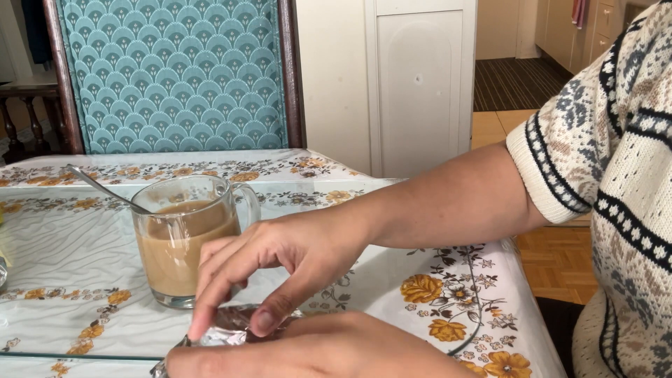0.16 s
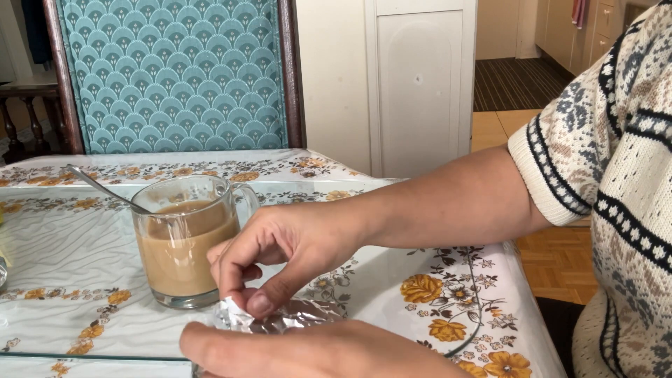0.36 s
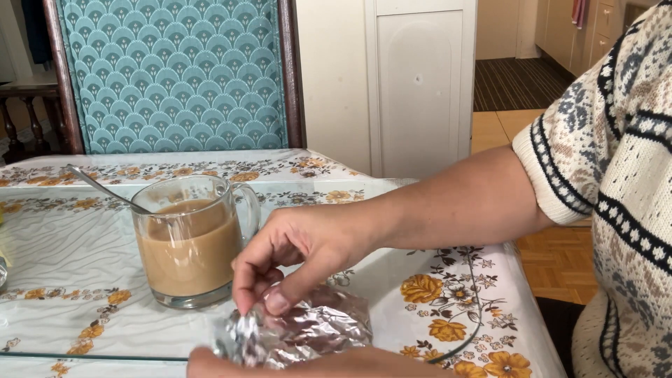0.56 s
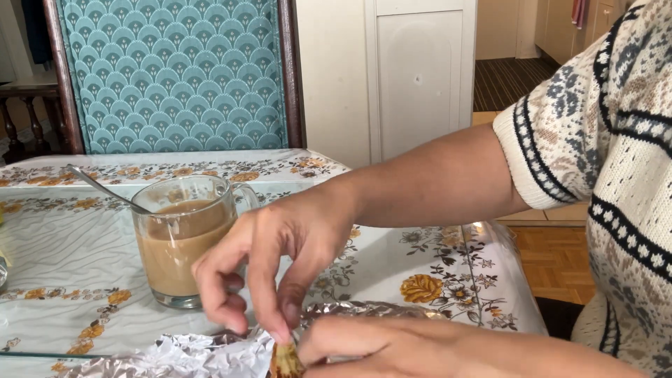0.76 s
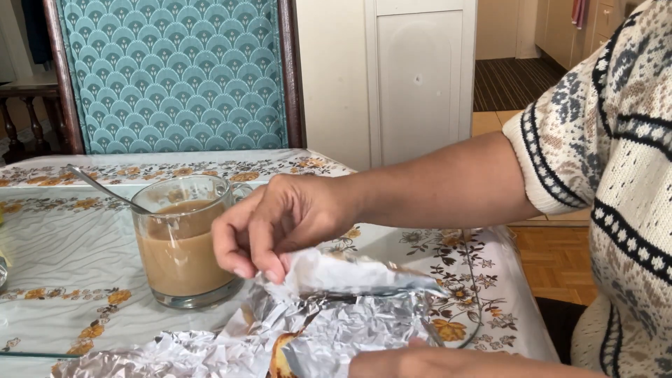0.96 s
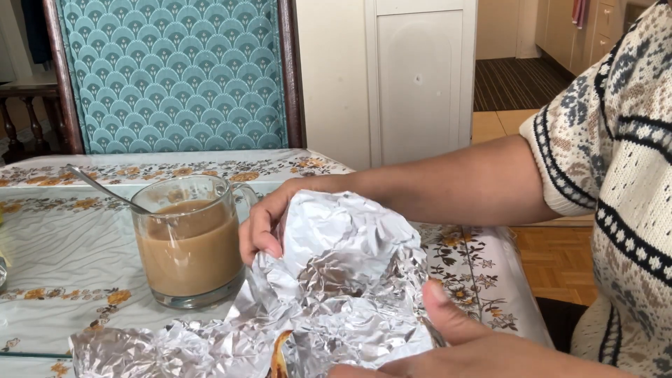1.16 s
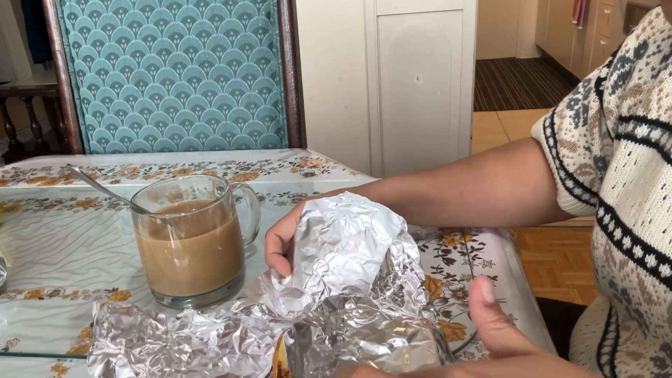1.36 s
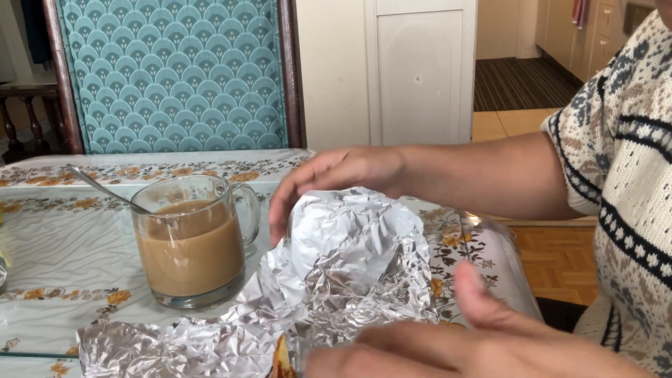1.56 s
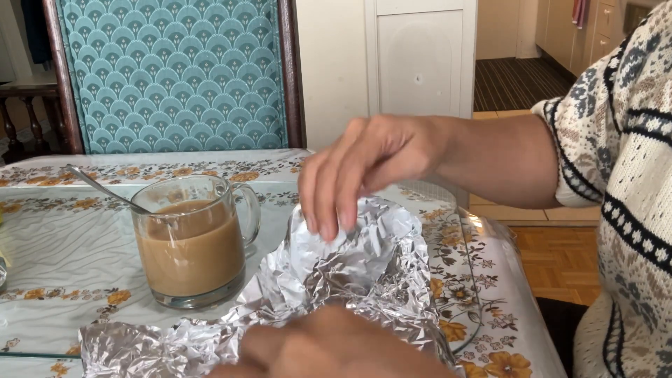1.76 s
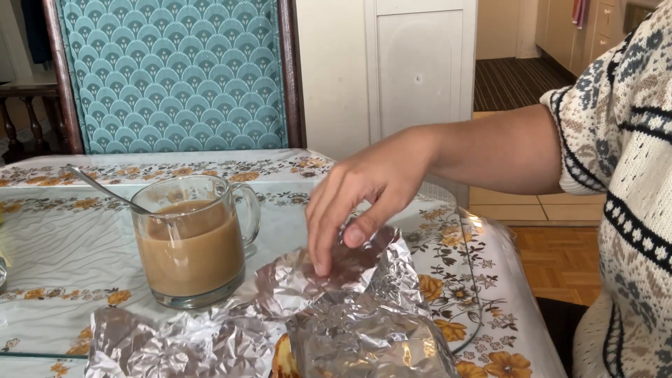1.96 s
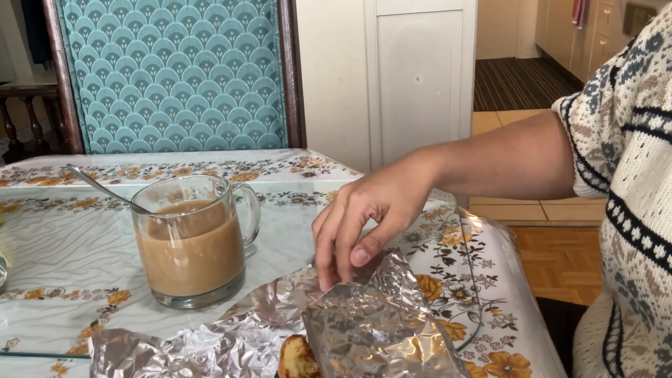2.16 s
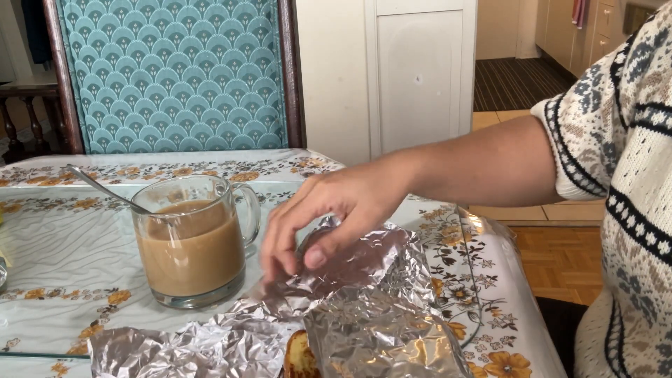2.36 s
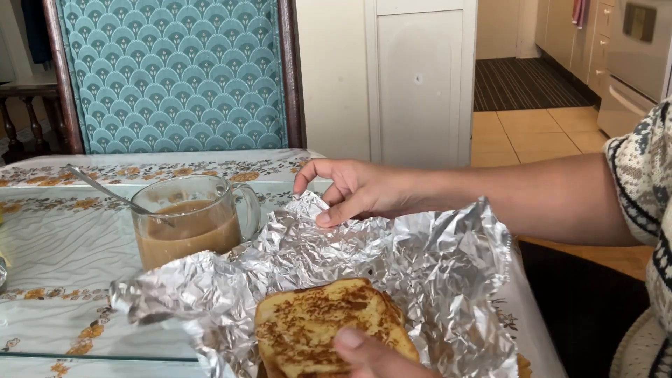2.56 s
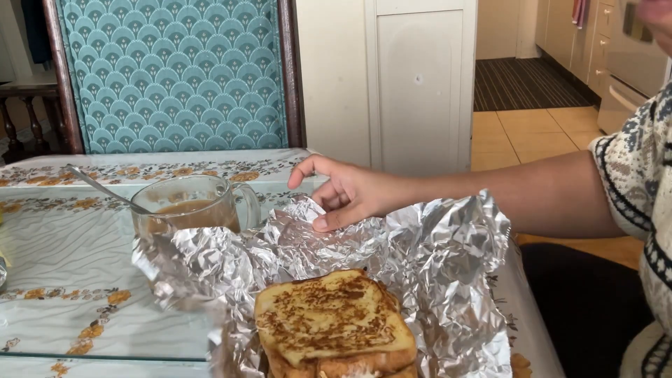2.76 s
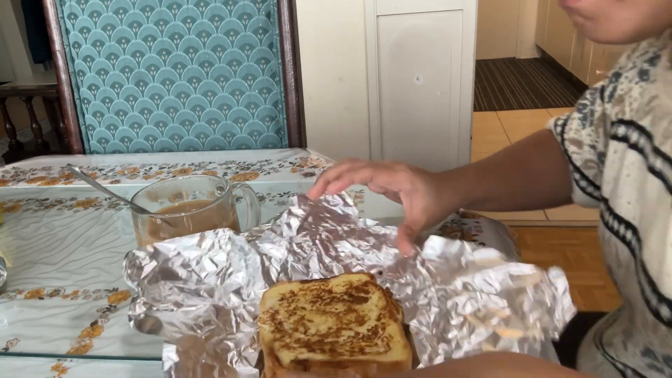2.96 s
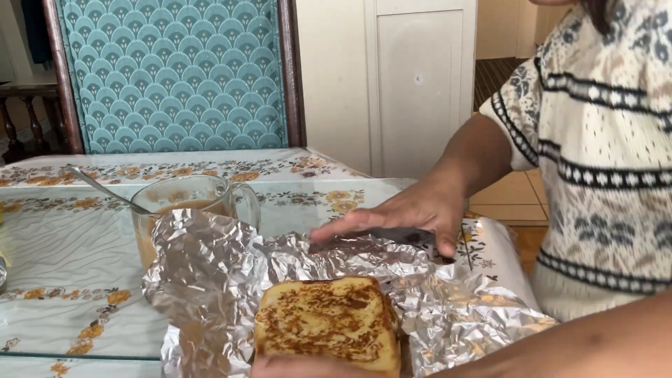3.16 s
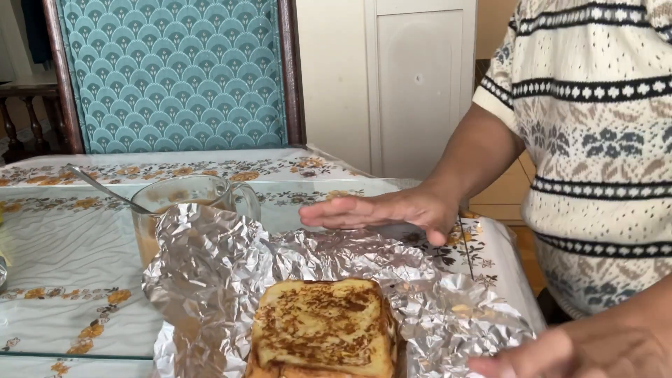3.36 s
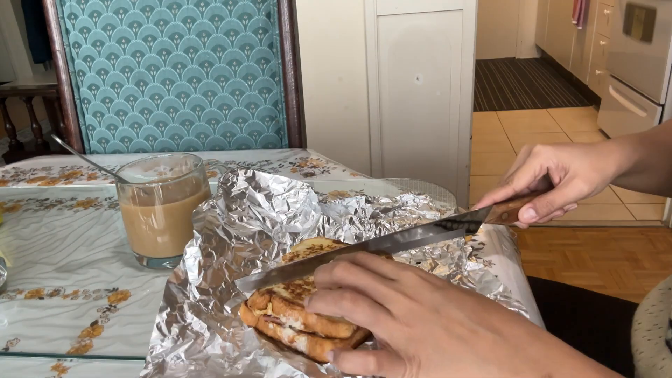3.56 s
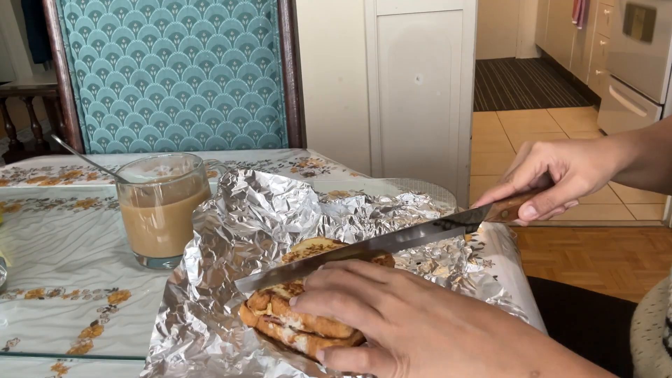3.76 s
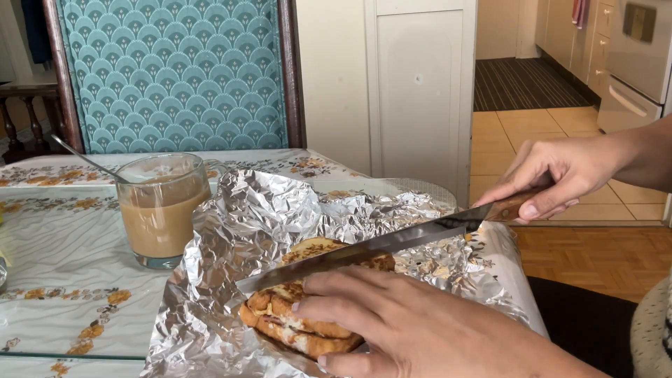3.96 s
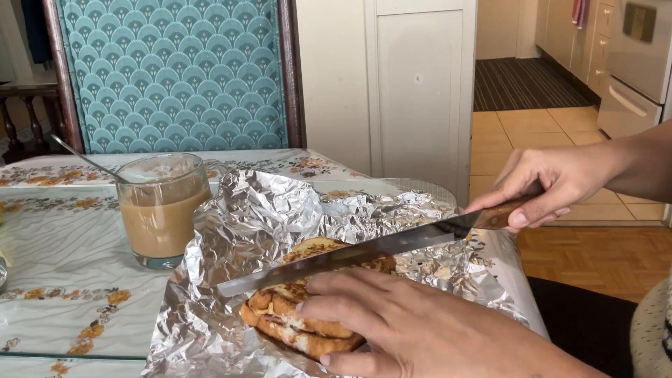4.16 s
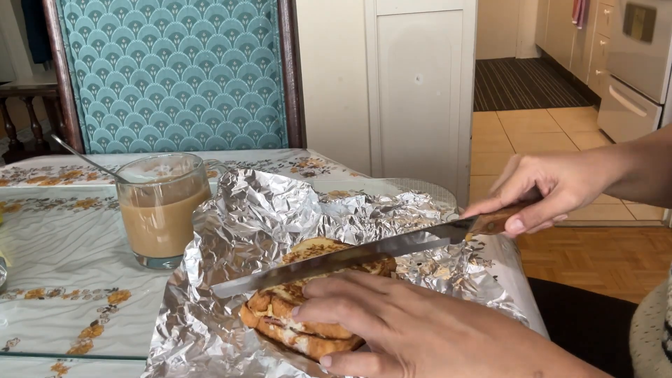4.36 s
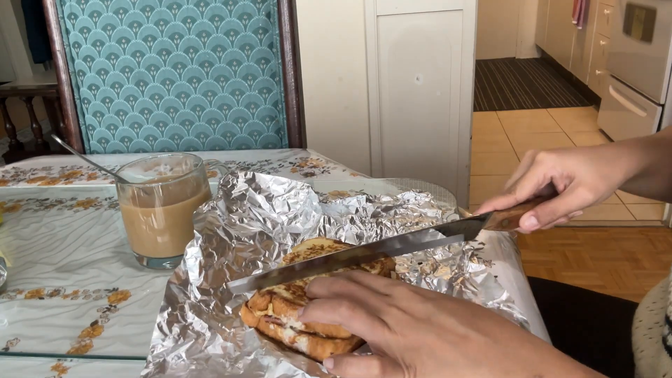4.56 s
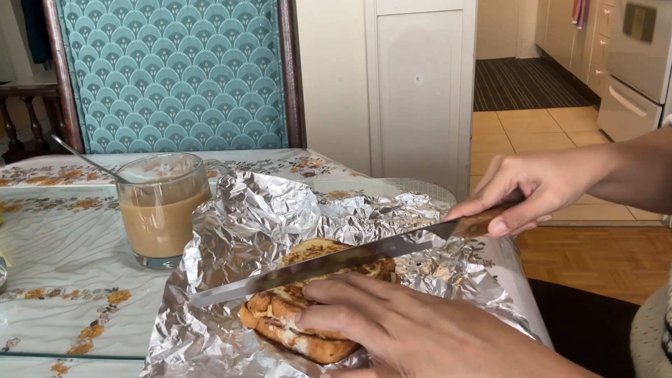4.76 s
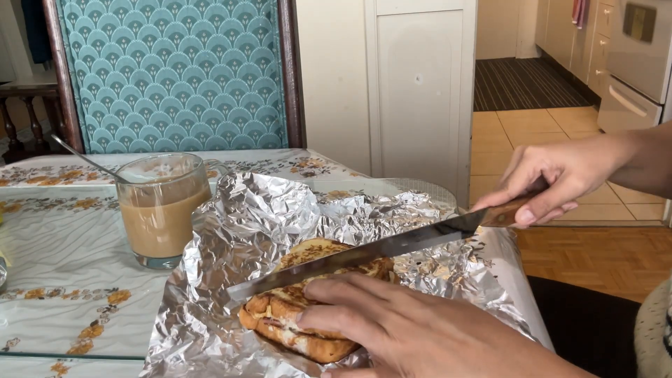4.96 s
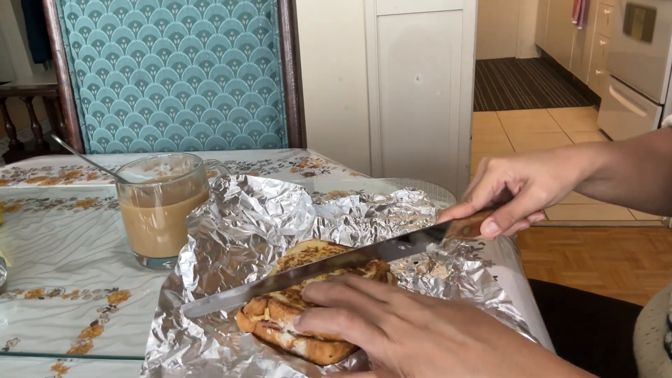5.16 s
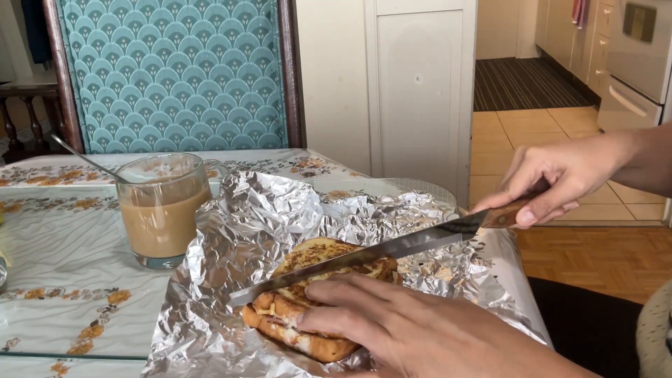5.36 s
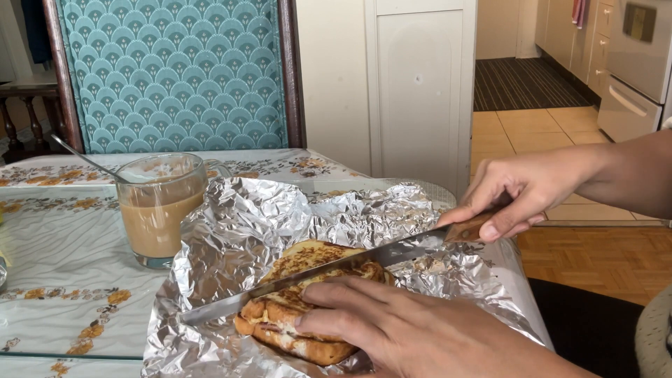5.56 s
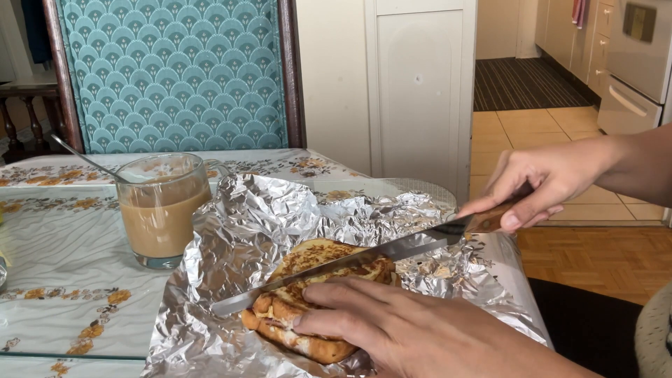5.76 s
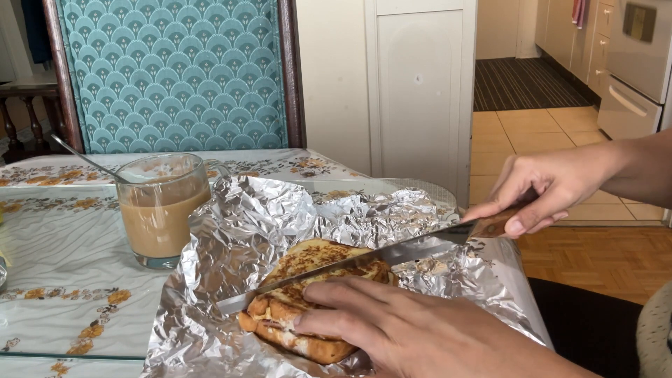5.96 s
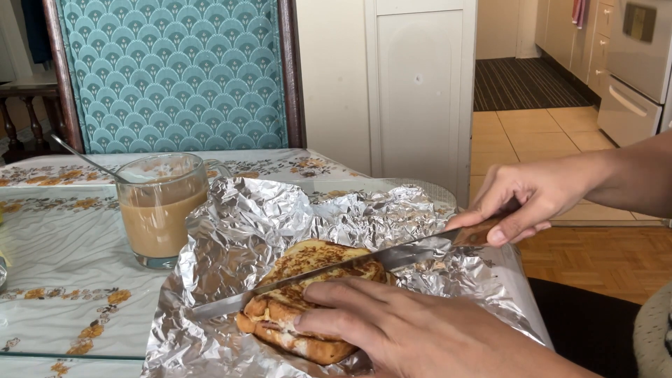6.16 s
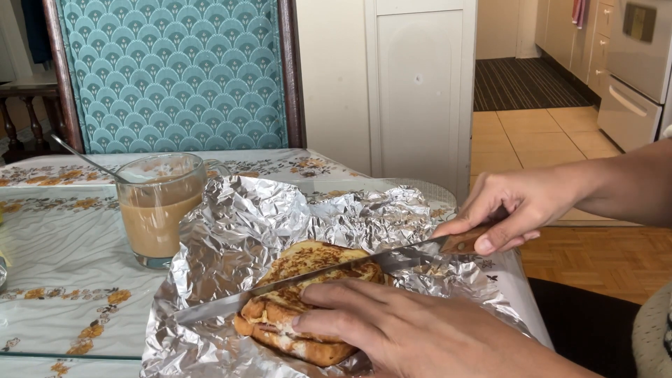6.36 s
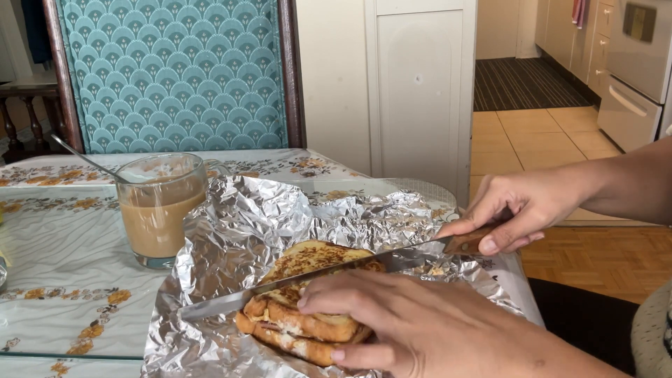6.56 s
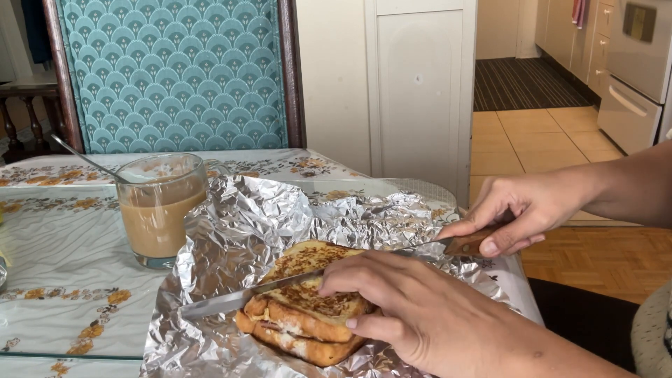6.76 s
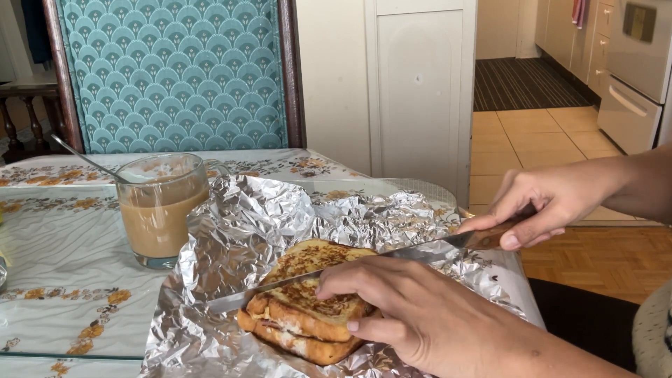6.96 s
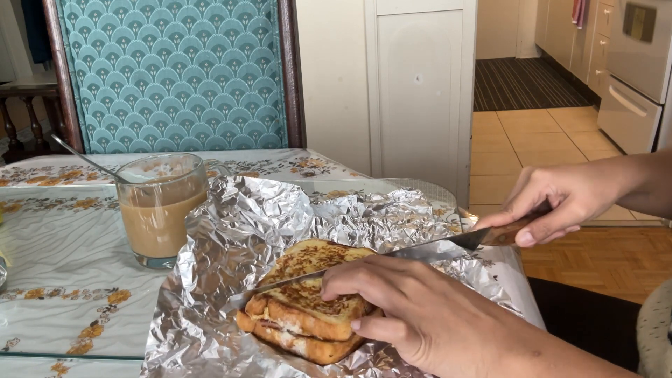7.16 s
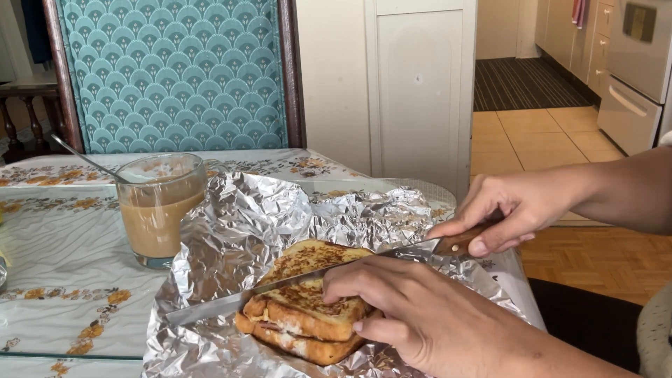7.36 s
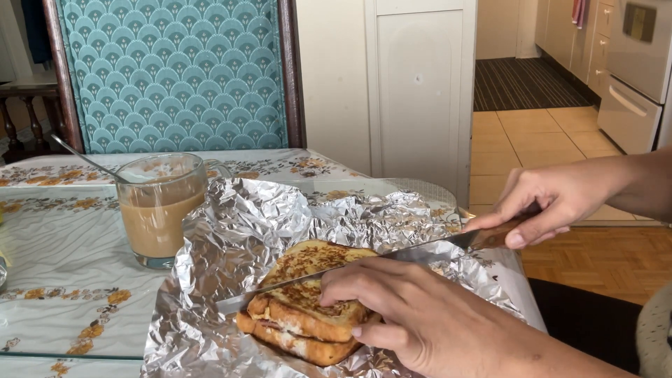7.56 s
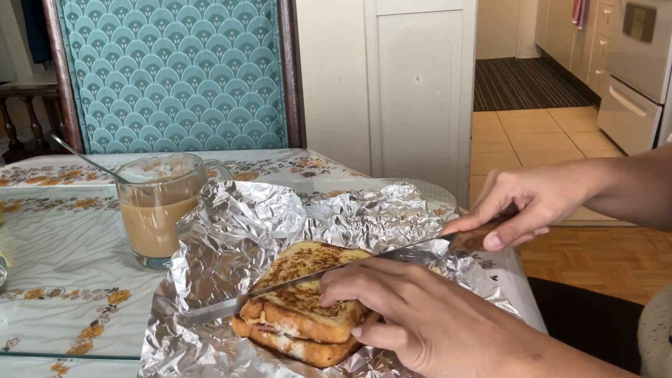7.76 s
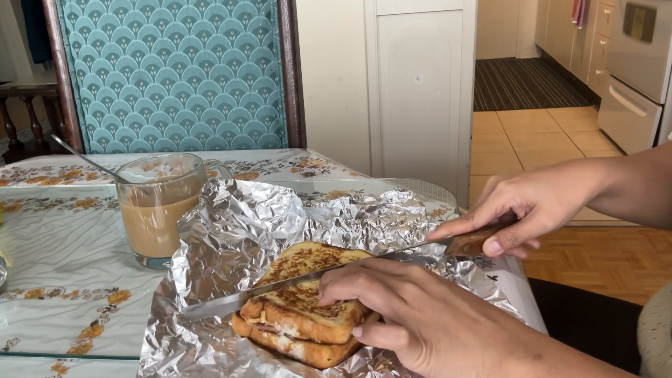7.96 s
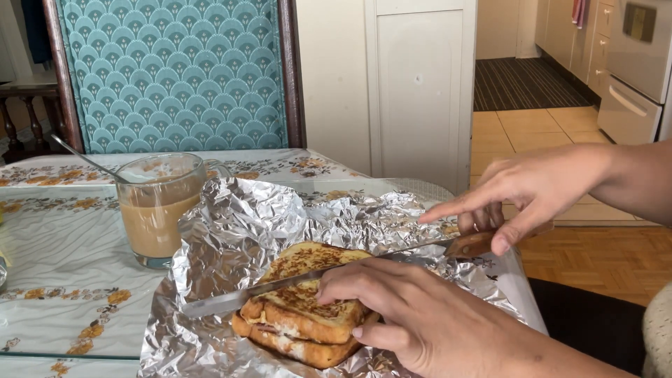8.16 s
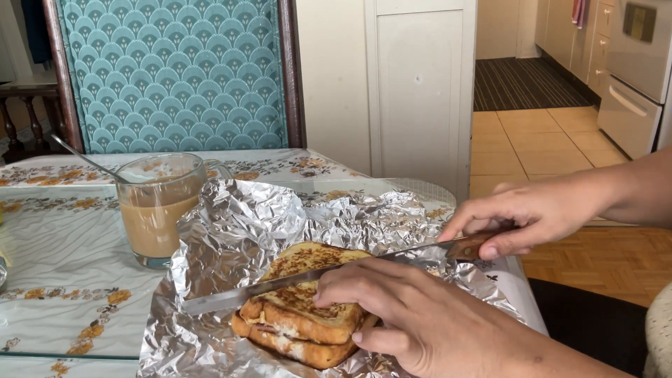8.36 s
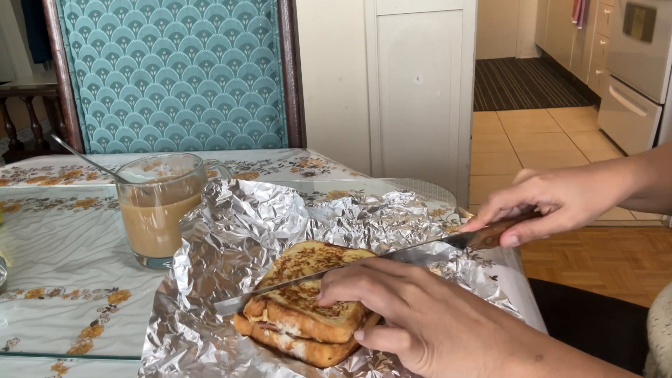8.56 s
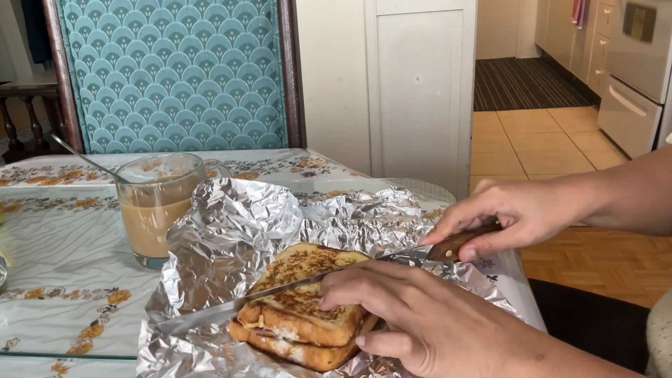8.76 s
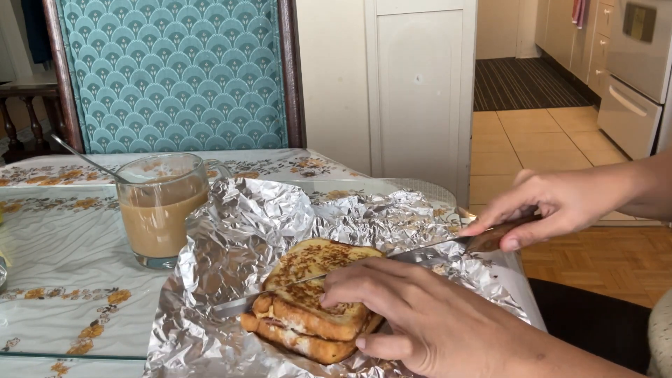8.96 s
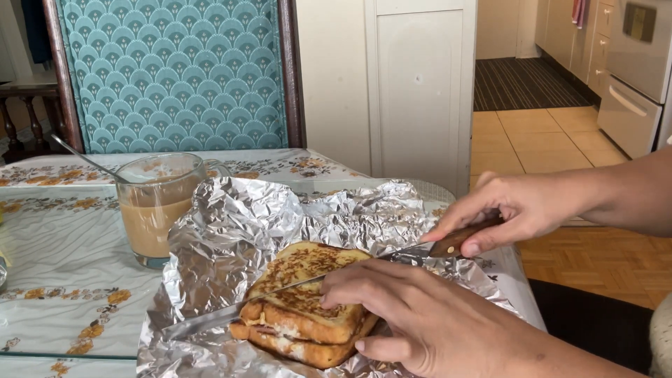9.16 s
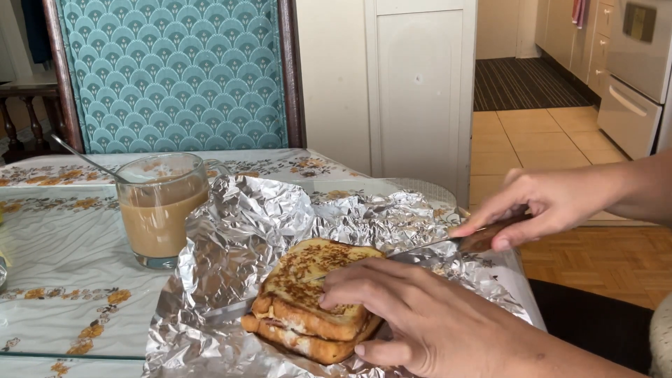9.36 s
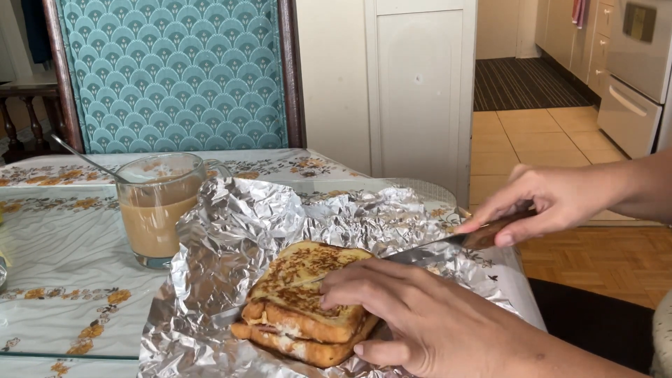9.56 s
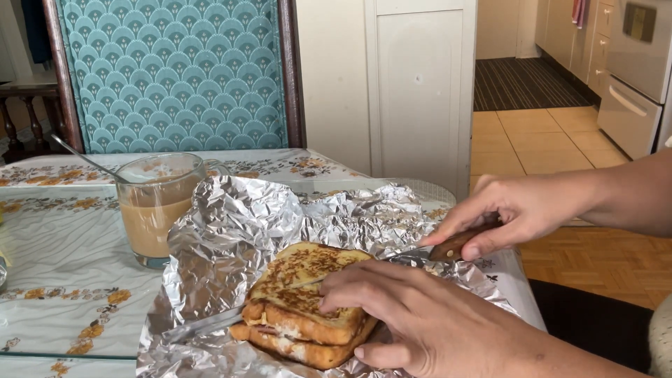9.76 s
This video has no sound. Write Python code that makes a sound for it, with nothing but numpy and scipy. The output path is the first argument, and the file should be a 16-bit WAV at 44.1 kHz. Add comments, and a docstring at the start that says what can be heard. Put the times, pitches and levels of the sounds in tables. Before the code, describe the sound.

Close, bright foil crinkling in uneven bursts, then a sudden jump to soft gritty cutting through toast on foil in a humming kitchen.

```python
"""Hands peel aluminium foil off a toasted sandwich close to a stereo microphone: creases buckle in swarms of
noise-excited snaps, taut facets ring as resonators, and the parcel knocks on the table in bands of noise.
At 3.6 s the scene jumps ahead: a faint reedy tone of decaying partials dies away, then a knife saws
through the toast on the foil in gritty noise bands, with finer crackle and ticks.
Throughout, a rumble of shaped noise and a mains hum of wavering sines fill the small room."""
import sys
import numpy as np
from scipy import signal
from scipy.fft import rfft, irfft
from scipy.io import wavfile
from scipy.ndimage import uniform_filter1d, map_coordinates

SR = 44100
rng = np.random.default_rng(int(sys.argv[2]) if len(sys.argv) > 2 else 0)


def persist_wave(psi):
    """Save psi, clipped to +-1, as 16-bit WAV."""
    counts = np.round(np.clip(psi, -1, 1) * 32767).astype(np.int16)
    wavfile.write(sys.argv[1], SR, np.atleast_2d(counts).T)


N = 436590
TIME = np.arange(N) / SR
JUMP_S = 3.601  # unwrapping before, cutting after


def amp(db):
    """Decibel law: level in dB to amplitude ratio."""
    return 10 ** (np.asarray(db) / 20)


def unit(x):
    """Normalization: scales to an rms of one."""
    return x / np.sqrt(np.mean(x ** 2) + 1e-20)


def read(points, hz, axis=1):
    """Interpolation: reads one column of a table along log frequency."""
    table = np.transpose(points)
    return np.interp(np.log(hz + 1), np.log(table[0] + 1), table[axis])


def bins(x):
    """Fourier analysis: the frequencies of a sound's spectrum."""
    return np.fft.rfftfreq(x.shape[-1], 1 / SR)


def add(mix, s, sound):
    """Superposition: lays a stereo sound into the mix at time s."""
    part = mix[:, max(round(s * SR), 0):][:, :sound.shape[1]]
    part += sound[:, :part.shape[1]]


def causal(db):
    """Causality: the minimum-phase response with the given gain, so nothing sounds before the blow."""
    nepers = np.log(amp(np.r_[db, db[-2:0:-1]]))
    return np.exp(np.conj(signal.hilbert(nepers)))[:len(db)]


def split(x, cross_hz=2700):
    """Band splitting: body and treble of a sound, each of rms one."""
    bands = []
    for kind in ("low", "high"):
        half = signal.butter(2, cross_hz, kind, fs=SR, output="sos")
        bands.append(unit(signal.sosfilt(np.vstack([half, half]), x)))
    return bands


def moves(table, attack_s, release_db_per_s, settle_db, settle_db_per_s):
    """Two-stage relaxation: a move takes hold, swells or eases, lets go; the sheet settles. Treble, body power."""
    power = np.zeros((2, N))
    for start, length, db, swell_db, heft_db in table:
        t = np.maximum(TIME - start, 0)
        after = np.maximum(t - length, 0)
        grip = (1 + np.tanh((TIME - start) / attack_s - .5)) / 2
        hold = grip * amp(db + swell_db * (np.minimum(t / length, 1) - .5))
        settling = min(amp(settle_db), 1)
        quick = (1 - settling) * amp(-release_db_per_s * after)
        slow = settling * amp(-settle_db_per_s * after)
        power += np.outer([1, amp(heft_db)], hold * (quick + slow)) ** 2
    return power


# the fingers pull at the foil: start_s, length_s, level_db (treble, mid-move),
# swell_db (start to end), heft_db (body relative to treble)
FINGER_PULLS = [(0.0, 0.4, -45, 12.5, -5.5), (0.192, 0.043, -38.5, -13, -15.5),
                (0.425, 0.0086, -31, 8, -7.5), (0.47, 0.13, -47, -2.5, -6.5), (0.6, 0.094, -36.5, 1.5, -7),
                (0.712, .15, -36.5, -2, -6.5), (0.915, 0.18, -38, 2, -9.5), (1.04, 0.084, -32.5, 15.5, -10),
                (1.15, 0.058, -41, 6.5, -11), (1.28, 0.23, -43.5, -4.5, -5.5), (1.772, 0.074, -44, 1.5, -2),
                (1.86, 0.19, -29.5, 2.5, -6), (2.07, 0.39, -38, -1, -10), (2.35, 0.03, -33, 1.5, -4),
                (2.472, 0.15, -32.5, 3, -10.5), (2.708, 0.06, -29, 1.5, -11.5), (2.81, 0.12, -35, 12, -7),
                (2.974, 0.11, -29, -1.5, -10), (3.09, 0.17, -43, -0.5, -9.5), (3.26, 0.17, -46.5, 1, -3),
                (3.397, 0.048, -37.5, 4, -6), (3.49, 0.1, -46.5, 1.5, -1.5)]
# knife and hand push the sandwich about on the foil: same columns
KNIFE_STROKES = [(4.012, 0.17, -60.5, -4, -8), (4.19, 0.21, -66.5, -8.5, -0.5),
                 (4.455, 0.021, -57.5, -12, 2.5), (4.56, 0.2, -58.5, 4.5, -2.5),
                 (4.83, 0.16, -57.5, -13, -24), (4.983, 0.029, -42.5, -6.5, -11),
                 (5.083, 0.047, -47, -6, 0), (5.19, 0.034, -54, 8.5, 0), (5.408, 0.081, -49, -4, -6),
                 (5.52, 0.04, -40, -5, -1.5), (5.58, 0.13, -45, 0.5, -5), (5.942, 0.067, -49, 7, -9),
                 (6.128, 0.072, -40.5, -5.5, -1.5), (6.235, 0.11, -51, -1, 2.5),
                 (6.41, 0.18, -50.5, 8.5, -3.5), (6.537, 0.21, -51.5, 10.5, -9),
                 (6.78, 0.071, -54, 6.5, -3), (6.942, 0.056, -59, -14, -3.5), (7.12, 0.23, -50, 5, -5.5),
                 (7.308, 0.041, -35, -0.5, -4.5), (7.435, 0.02, -35, 2, -7), (7.585, 0.12, -51, 12, -7),
                 (7.762, 0.015, -32, -1.5, -4), (8.025, 0.052, -57.5, -6, 11.5), (8.13, 0.04, -58, -6, 4),
                 (8.26, 0.15, -58.5, 3.5, -2.5), (8.54, 0.082, -53.5, 9, -2.5), (8.662, 0.069, -35, -4, -7),
                 (8.817, 0.074, -43.5, 2, -5.5), (8.975, 0.058, -57, -10, 3.5), (9.035, 0.12, -35, 7, -7.5),
                 (9.245, 0.085, -39, -1, -7), (9.403, 0.041, -42, -2.5, 0), (9.5, 0.12, -39.5, 11, -10.5),
                 (9.606, 0.066, -33, 2, -6), (9.75, 0.12, -39.5, 7, -5)]


def handling(rest_db=-85):
    """Summed power of the moves: relative treble level of the crackle, and its body relative to that, in dB."""
    fingers = moves(FINGER_PULLS, attack_s=0.0054, release_db_per_s=322.5,
                    settle_db=-15.0, settle_db_per_s=130.0)
    knife = moves(KNIFE_STROKES, attack_s=0.0089, release_db_per_s=299.5,
                  settle_db=-19.5, settle_db_per_s=108.0)
    power = np.where(TIME < JUMP_S, fingers, knife) + amp(rest_db) ** 2
    treble_db, body_db = 10 * np.log10(power)
    return treble_db, body_db - treble_db


# tone colour of the crumpled sheet: frequency_hz, level_db (per Hz)
FOIL_COLOUR = [(90, -2), (250, -1.5), (500, -1.5), (850, -1), (1500, 0), (4500, 5.5), (7000, 3), (9500, 2),
               (12500, -2.5), (15500, -11.5), (16500, -34)]
# stereo spread: frequency_hz, left_lead_rad (phase), likeness (0-1)
STEREO_SPREAD = [(450, .7, .62), (1200, .2, .9), (2300, .55, .65), (4500, 2.6, .7), (7300, 2.4, .65),
                 (9000, .05, .94), (13000, 1.4, .75), (15000, 3, .95)]


def crease(crack_s, slips_s, ring_db, count=3, size=1024):
    """Buckling instability: a crease yields in quick slips, coloured by the resonances of nearby facets."""
    t = np.arange(size) / SR
    starts = np.r_[0, np.cumsum(rng.uniform(.3, 1.4, count - 1) * slips_s)][:, None]
    strengths = np.r_[1, rng.uniform(.25, 1, count - 1)]
    slips = strengths @ ((t >= starts) * np.exp(-abs(t - starts) / crack_s))
    ring_s, facets_db = .004, 4.6
    envelope = slips + amp(ring_db) * np.exp(-t / ring_s)
    shared, apart = rfft(rng.standard_normal((2, size)) * envelope)
    hz = bins(t)
    # the two channels share part of the noise, the right one later in phase
    like = np.clip(read(STEREO_SPREAD, hz, axis=2), 0, 1)
    right = like * shared + np.sqrt(1 - like ** 2) * apart
    right = right * np.exp(-1j * read(STEREO_SPREAD, hz))
    facet_hz = np.geomspace(700, 16000, 20)
    facets = np.interp(hz, facet_hz, np.r_[0, rng.standard_normal(len(facet_hz) - 1)])
    colour = causal(read(FOIL_COLOUR, hz) + facets_db * facets)
    pair = irfft(np.array([shared, right]) * colour)
    fade = np.minimum(1, 2 * (1 - t / t[-1])) ** 2
    return unit(pair * fade)


def flex(x, size=256):
    """Time-varying resonance: as the sheet bends, its resonances come and go every few hundredths of a second."""
    hold_s, depth_db, facet_hz = .035, 3.2, np.geomspace(400, 16000, 20)
    hz, frame_s, z = signal.stft(x, SR, nperseg=size)
    shapes = rng.standard_normal((len(facet_hz), int(frame_s[-1] / hold_s) + 2))
    facet = np.interp(hz, facet_hz, np.arange(len(facet_hz)))
    where = np.meshgrid(facet, frame_s / hold_s, indexing="ij")
    gain = amp(depth_db * map_coordinates(shapes, where, order=1))
    return signal.istft(z * gain, SR, nperseg=size)[1][:, :N]


def crackle(level_db, heft_db, treble_db=-2.22, body_db=-4.0, count=160):
    """Poisson process: swarms of creases crowd with effort, coarse under fingers, fine and dense under the knife."""
    unwrapping = TIME < JUMP_S
    per_s = np.where(unwrapping, 330, 620)  # creases a second at a handling level of -40 dB
    spread_db = np.where(unwrapping, 5.6, 4.4)
    crowding, cap = .75, 3
    rate = per_s * amp(crowding * (np.maximum(level_db, -50) + 40))
    at = np.flatnonzero(rng.random(N) < rate / SR)
    sizes = amp(spread_db * np.minimum(rng.exponential(1, N), cap))[at]
    kinds = rng.integers(0, count, N)[at]
    bank = [crease(crack_s=.0005, slips_s=.0009, ring_db=-20) for _ in range(count)]
    swarm = np.zeros((2, N))
    for start, strength, kind in zip(at, sizes, kinds):
        add(swarm, start / SR, strength * bank[kind])
    # sliding adds hiss between the creases: a little from fingers, more where the blade glides
    rub_db = np.where(unwrapping, -13, -8)
    noise = rfft(rng.standard_normal((2, N)))
    rub = irfft(noise * amp(read(FOIL_COLOUR, bins(TIME))), N)
    swarm = flex(unit(swarm) + amp(rub_db) * unit(rub * np.sqrt(rate)))
    # the hand feeds in energy steadily, however it is shared among the creases
    power = uniform_filter1d(uniform_filter1d(swarm ** 2, size=2300).mean(0), size=1500)
    body, treble = split(swarm / np.sqrt(power))
    return amp(level_db) * (amp(treble_db) * treble + amp(heft_db + body_db) * body)


# creases that snap through with more or less body: start_s, level_db (over 5 ms, before gain),
# heft_db (body relative to treble)
CREASE_SNAPS = [(0.068, -33, -25), (0.1704, -24, -6.5), (0.297, -31, -15.5), (0.4425, -21.5, -12),
                (0.4523, -22.5, -9), (0.7134, -19.5, -9.5), (0.739, -28.5, 1), (0.9063, -33, -5.5),
                (0.966, -25, -29), (1.194, -30.5, -23), (1.4614, -31.5, -16), (1.734, -41, -6.5),
                (1.8663, -25, -14), (2.028, -26, -23), (2.52, -44, -9), (2.655, -24.5, -16),
                (2.7041, -30, -12), (2.7848, -24.5, -12), (2.843, -27.5, -7), (2.9345, -25.5, -18),
                (2.976, -27, -18), (2.9907, -21.5, -13), (3.069, -23, -5), (3.5665, -35.5, -6.5),
                (4.8426, -37.5, -4.5), (5.48, -43, 0.5), (5.5425, -30.5, -10), (5.9481, -40, -15.5),
                (7.7648, -29, -12), (7.905, -43, -11), (8.8205, -36.5, -4.5), (9.156, -29, -9.5),
                (9.318, -32, -16), (9.682, -28, -4)]


def snaps(table, crack_s, slips_s, ring_db, gain_db, cross_hz=2100, db_per_octave=20.0):
    """Size scaling: creases give way one by one; a wide facet cracks slowly with body, a narrow one ticks high."""
    out, span_s = np.zeros((2, N)), .005
    for s, db, heft_db in table:
        crack = crease(crack_s * amp(heft_db / 5), slips_s, ring_db)
        # more body lowers the crossover
        split_hz = np.clip(cross_hz * 2 ** (-heft_db / db_per_octave), 1800, 7500)
        body, treble = split(crack, split_hz)
        snap = unit(treble + amp(heft_db) * body)
        add(out, s, amp(db + gain_db) * snap * np.sqrt(span_s * SR / snap.shape[1]))
    return out


# taut facets that pop through, the widest with a hollow knock: start_s, level_db (over 5 ms), pitch_hz
FACET_PINGS = [(0.069, -37.5, 1340), (0.2178, -27, 3980), (0.3801, -29, 2280), (0.4425, -36, 1490),
               (0.4515, -22, 1730), (0.545, -38, 2700), (0.6799, -29.5, 3000), (0.7138, -25, 1620),
               (0.859, -38.5, 2060), (1.233, -34.5, 1150), (1.268, -30.5, 7600), (1.284, -34, 1110),
               (1.2997, -26.5, 3750), (2.715, -32, 2320), (2.843, -28, 1900)]


def pings(table, crack_db=-6, width_hz=480):
    """Impulsive excitation: a taut facet pops through, its crack setting one resonance ringing briefly."""
    out, span_s = np.zeros((2, N)), .005
    for s, db, hz in table:
        crack = crease(crack_s=.0007, slips_s=.0012, ring_db=-18)
        b, a = signal.iirpeak(hz, hz / width_hz, fs=SR)
        ring = signal.lfilter(b, a, crack)
        ping = unit(unit(ring) + amp(crack_db) * crack)
        add(out, s, amp(db) * ping * np.sqrt(span_s * SR / ping.shape[1]))
    return out


# short bright ticks of the foil: start_s, level_db (over 5 ms, before gain)
FOIL_TICKS = [(0.083, -36), (0.501, -34), (0.995, -29), (1.125, -31), (1.404, -38), (2.297, -33.5),
              (2.614, -31.5), (2.749, -28.5), (2.89, -38), (3.168, -37), (3.305, -42), (3.37, -36.5),
              (3.4505, -27), (3.542, -37), (3.795, -50.5), (3.9762, -45.5), (4.015, -46.5), (4.0927, -42.5),
              (4.195, -48), (4.216, -43), (4.263, -49), (4.422, -57.5), (4.536, -39), (4.575, -49),
              (4.6197, -41), (4.61, -47), (4.738, -46), (4.911, -42), (4.99, -46), (5.033, -41),
              (5.168, -35.5), (5.227, -53), (5.3544, -37.5), (5.582, -38), (5.742, -37.5), (5.924, -40),
              (6.54, -33), (6.66, -33.5), (6.691, -40), (6.834, -35.5), (7.017, -44.5), (7.176, -42.5),
              (7.241, -41), (7.253, -46), (7.681, -35), (8.023, -42), (8.284, -45), (8.848, -33.5),
              (8.989, -54), (9.2276, -31), (9.3765, -37), (9.507, -36.5), (9.745, -36)]


def ticks(level_db, over_db=2, scatter_db=7, ceiling_db=-37, heft_db=-19, count=130):
    """Snap-through: short bright ticks in quick slips; strays go at random, above the handling level to a ceiling."""
    at = rng.integers(0, N, count)
    stray_db = level_db[at] + over_db + scatter_db * rng.random(count)
    stray_db = np.minimum(stray_db, ceiling_db)
    strays = list(zip(at / SR, stray_db))
    rows = [(s, db, heft_db) for s, db in FOIL_TICKS + strays]
    return snaps(rows, crack_s=.0008, slips_s=.0007, ring_db=-18, gain_db=0.5)


def bursts(table, band_ratio, apart, rise_share, grit, push, size=16000):
    """Band-limited excitation: noise swells and dies, optionally led by one push or roughened by grit."""
    out, t = np.zeros((2, N)), np.arange(size) / SR
    ratio = max(band_ratio, 1.1)
    for s, db, hz, decay_s in table:
        middle, side, grain = rng.standard_normal((3, size))
        shape = np.exp(-t / decay_s) * (1 - np.exp(-t / (rise_share * decay_s)))
        catching = np.exp(grit * unit(uniform_filter1d(grain, size=90)))
        band = signal.butter(2, [hz / ratio, hz * ratio], "band", fs=SR, output="sos")
        blow = push * np.linalg.norm(shape) * signal.unit_impulse(size)
        noise = np.array([middle + apart * side, middle - apart * side])
        sound = signal.sosfilt(band, blow + noise * shape * catching)
        add(out, s, amp(db) * unit(sound) * np.sqrt(np.mean(shape ** 2)))
    return out


# the blade rasps through the crust: start_s, level_db, centre_hz, decay_s
BLADE_RASPS = [(5.516, -25, 2820, 0.0038), (5.539, -20, 3850, 0.0076), (5.08, -53.5, 660, 0.16),
               (6.13, -42, 1640, 0.055), (6.19, -46, 670, 0.087), (6.24, -36, 3350, 0.031),
               (7.44, -33.5, 786, 0.013), (8.785, -39, 785, 0.03)]


def rasps():
    """Rough friction: each stroke swells and dies as the blade catches on grain."""
    return bursts(BLADE_RASPS, band_ratio=1.34, apart=0.19, rise_share=0.98, grit=0.73, push=0)


# soft knocks of parcel, hands and knife on the table: start_s, level_db, centre_hz, decay_s
TABLE_BUMPS = [(0.4525, -21, 225, 0.0028), (2.478, -30.5, 406, 0.005), (2.819, -35, 333, 0.037),
               (3.015, -32, 197, 0.025), (3.45, -36.5, 94.4, 0.02), (6.198, -44, 285, 0.012),
               (7.767, -50.5, 162, 0.074), (9.41, -47, 300, 0.037), (9.608, -46.5, 192, 0.028)]


def thuds():
    """Impact: one firm push leads a short low band of noise."""
    return bursts(TABLE_BUMPS, band_ratio=2.12, apart=0.12, rise_share=0.011, grit=0, push=0.32)


# toast and blade colour the sound while cutting: frequency_hz, gain_db
CUTTING_COLOUR = [(400, 4), (780, 2), (1150, -1), (1500, 3.5), (2150, -2), (4000, 3.5), (9000, 1),
                  (13000, 0)]


def coloured_by_cutting(dry):
    """Resonant filtering: toast and blade change the tone through a minimum-phase response."""
    return irfft(rfft(dry) * causal(read(CUTTING_COLOUR, bins(TIME))), N)


# kitchen reverberation: frequency_hz, t60_s
ROOM_DECAY = [(250, 0.59), (6000, 0.24), (14000, 0.017)]


def kitchen(x, wet_db=-12, near_db=-10, near_s=0.0041, size=20000):
    """Reverberation: quick reflections off table and mug, with a room tail that decays faster in the treble."""
    t = np.arange(size) / SR
    arrivals = (rng.random((2, size)) < 4000 / SR) * (t > .003)
    taps = rng.choice([-1., 1.], (2, size)) * arrivals
    hz, frame_s, z = signal.stft(taps, SR, nperseg=256)
    decay = amp(-60 * frame_s / read(ROOM_DECAY, hz)[:, None])
    tail = signal.istft(z * decay, SR, nperseg=256)[1][:, :size]
    near = unit(taps * np.exp(-t / near_s))
    echo = (amp(wet_db) * unit(tail) + amp(near_db) * near) / np.sqrt(size)
    return x + signal.fftconvolve(x, echo, axes=1)[:, :N]


def faint_tone(pitch_hz=405, db=-62, dull_hz=2150, count=7):
    """Frequency-dependent damping: partials two to seven of a reedy tone flutter away, the low ones lasting longest."""
    t = np.maximum(TIME - JUMP_S, 0)
    knots, fade_s = np.linspace(0, 1, 22), .14
    tone = 0
    for hz in pitch_hz * np.arange(2, count + 1):
        flutter = np.interp(t, knots, 1 + rng.rayleigh(1, len(knots))) / 2
        dulling = 1 + (hz / dull_hz) ** 4
        fade = np.exp(-t / fade_s * np.sqrt(dulling))
        tone = tone + flutter * np.sin(2 * np.pi * hz * t) * fade / dulling
    return amp(db) * tone / 2


# still kitchen: frequency_hz, level_db (per Hz, relative)
AIR_COLOUR = [(20, -22.5), (55, 6), (100, 2.5), (220, -2), (400, -15), (750, -21), (1400, -29.5),
              (3500, -45), (16000, -64)]
# mains hum: frequency_hz, level_db (before the lift ahead of the jump)
MAINS_HUM = [(119.6, -55.5), (178.5, -67.5)]


def background(air_db=-52.5, side_db=-17, wide_hz=450, waver=0.1, first_db=2.0):
    """Stationary noise and modulated sines: a rumble nearly mono in the bass, and a wavering hum."""
    hz = bins(TIME)
    middle, side = rfft(rng.standard_normal((2, N))) * amp(read(AIR_COLOUR, hz))
    side = side * (amp(side_db) + hz ** 2 / (hz ** 2 + wide_hz ** 2))
    air = amp(air_db) * unit(irfft([middle + side, middle - side], N))
    knots = np.linspace(0, TIME[-1], 90)
    for f, db in MAINS_HUM:
        swell, drift = (np.interp(TIME, knots, v) for v in rng.standard_normal((2, len(knots))))
        hum = (1 + waver * swell) * np.sin(2 * np.pi * f * TIME + waver * drift)
        air = air + amp(db) * unit(hum)
    return air * amp(first_db * (TIME < JUMP_S))  # louder while unwrapping


def scene(left_db=0.82):
    """Superposition: unwrapping, then an abrupt jump to cutting, over one background."""
    level_db, heft_db = handling()
    cracks = snaps(CREASE_SNAPS, crack_s=0.0014, slips_s=.0014, ring_db=-20, gain_db=0.5)
    foil = crackle(level_db, heft_db) + cracks + pings(FACET_PINGS)
    balance = amp([[left_db], [-left_db]])  # left raised, right lowered
    dry = (foil + thuds() + rasps()) * balance
    cutting = coloured_by_cutting(dry)
    foil_ticks, after = ticks(level_db), TIME >= JUMP_S
    tick_near_db = -12
    unwrap = kitchen(dry) + kitchen(foil_ticks, near_db=tick_near_db)
    # the cut starts with no echo of the unwrapping
    cut = kitchen(cutting * after) + kitchen(foil_ticks * after, near_db=tick_near_db)
    return unwrap * ~after + cut + background() + faint_tone()


EDGE_HZ = 16200  # low-pass cutoff


def record(dry):
    """Band limiting: a linear-phase windowed-sinc low-pass removes the highest treble."""
    lowpass = signal.firwin(255, EDGE_HZ, window=("kaiser", 9), fs=SR)
    return signal.oaconvolve(dry, lowpass[None], "same")


dry = scene()
out = record(dry)
persist_wave(out)
```